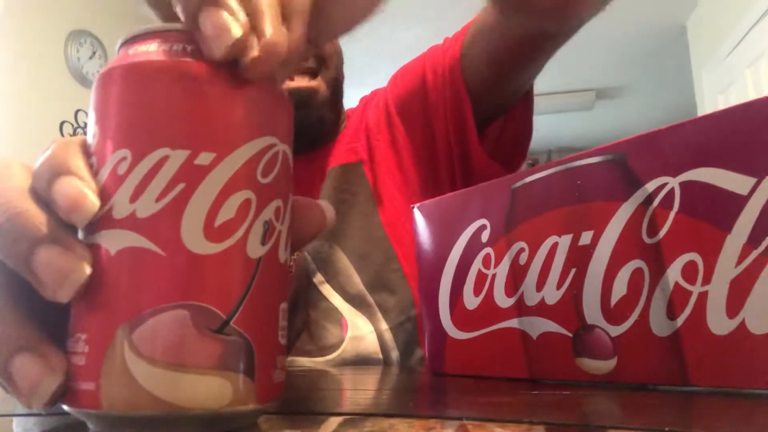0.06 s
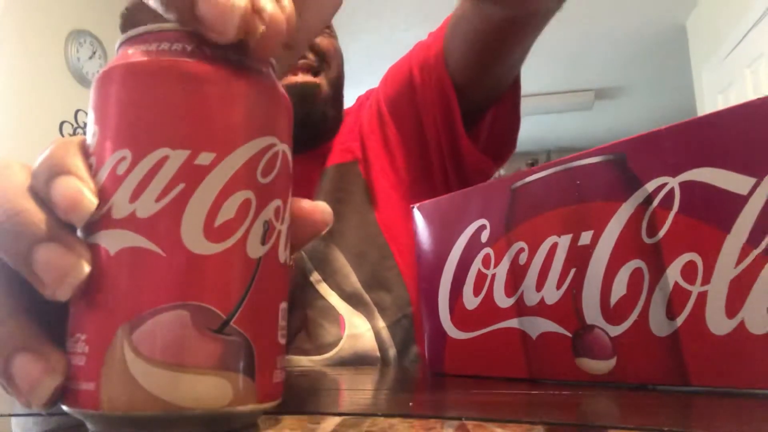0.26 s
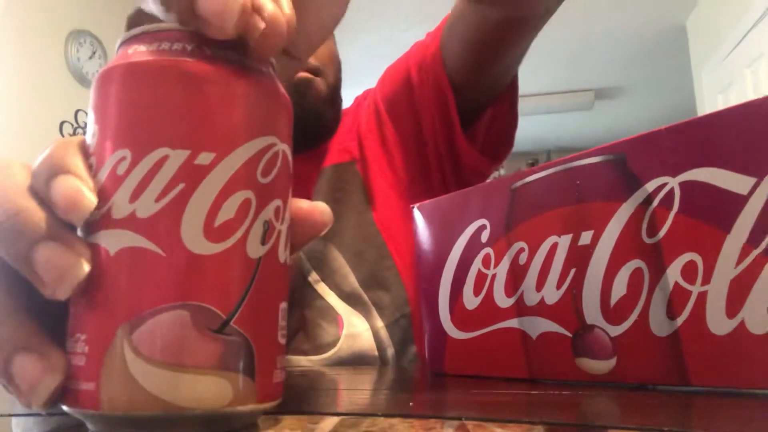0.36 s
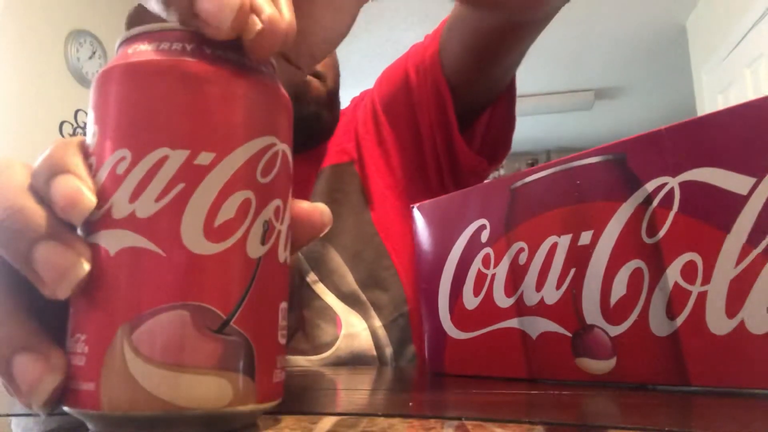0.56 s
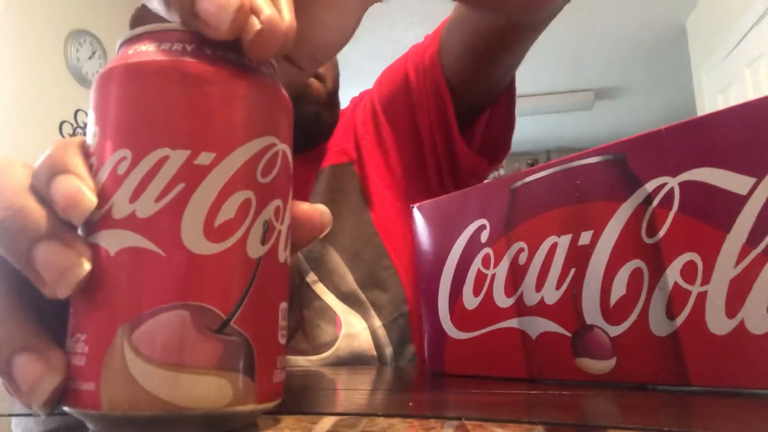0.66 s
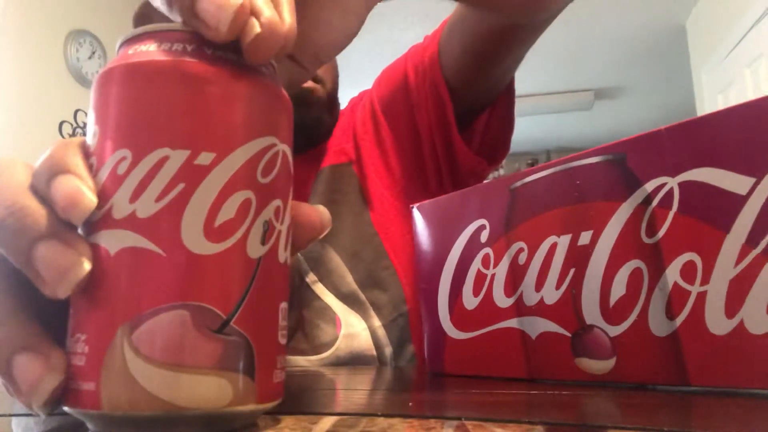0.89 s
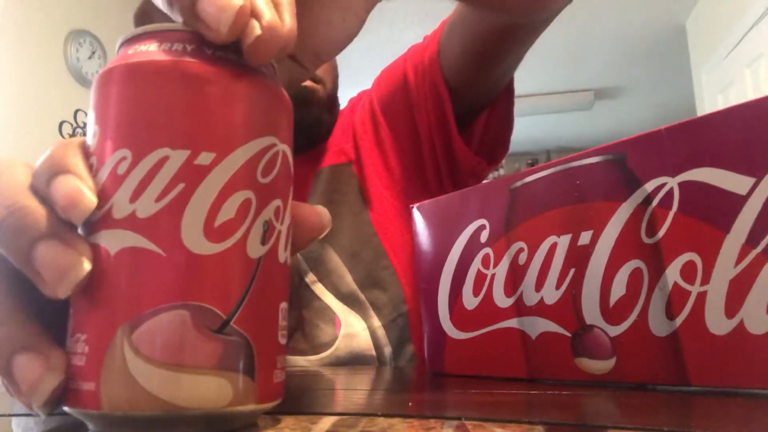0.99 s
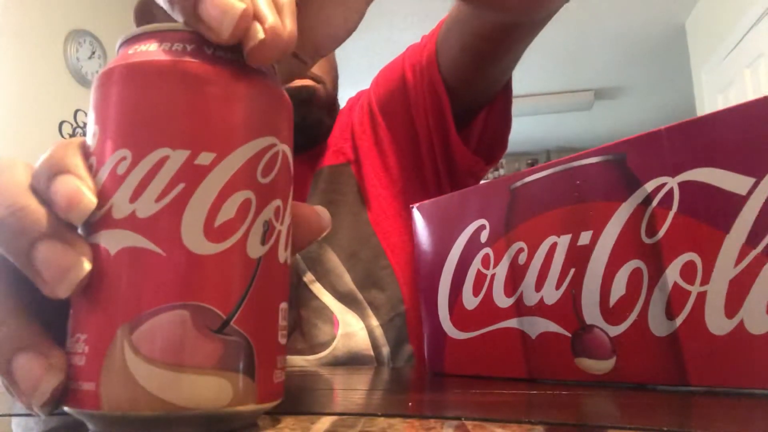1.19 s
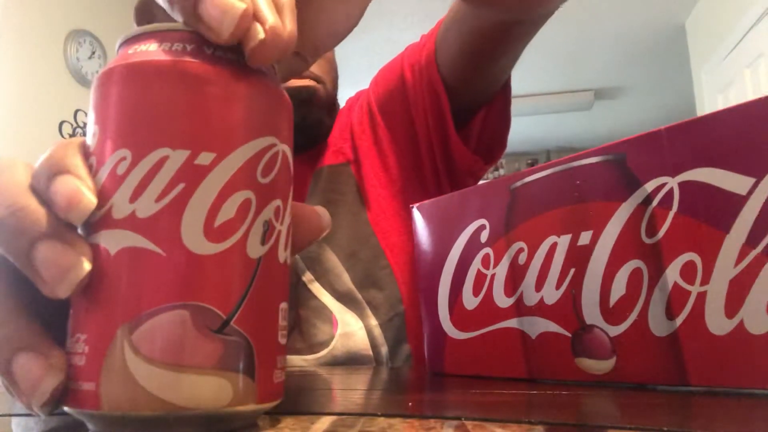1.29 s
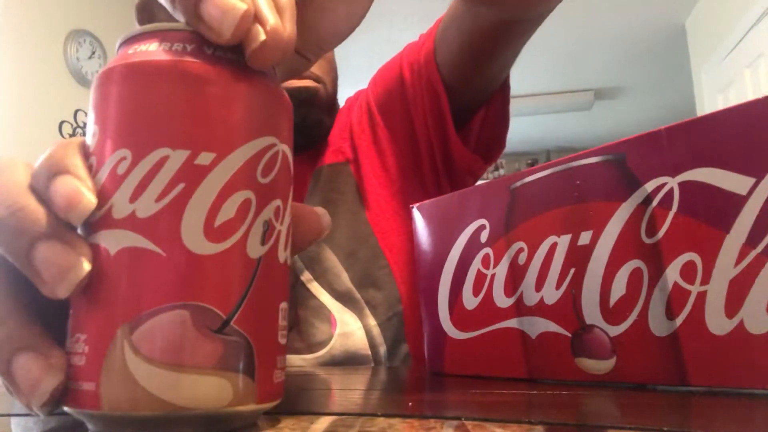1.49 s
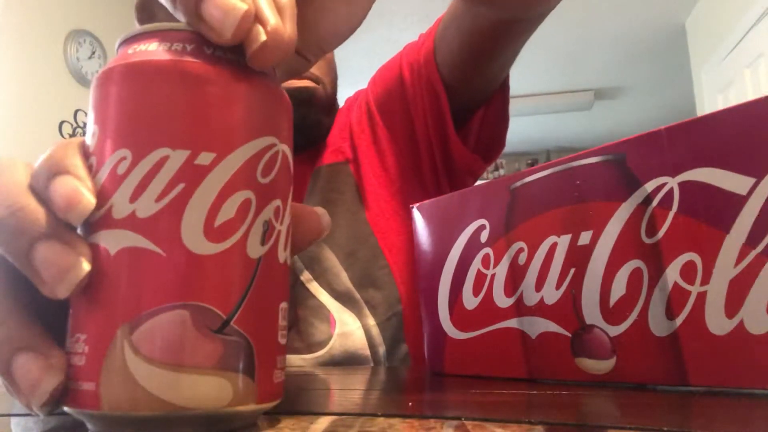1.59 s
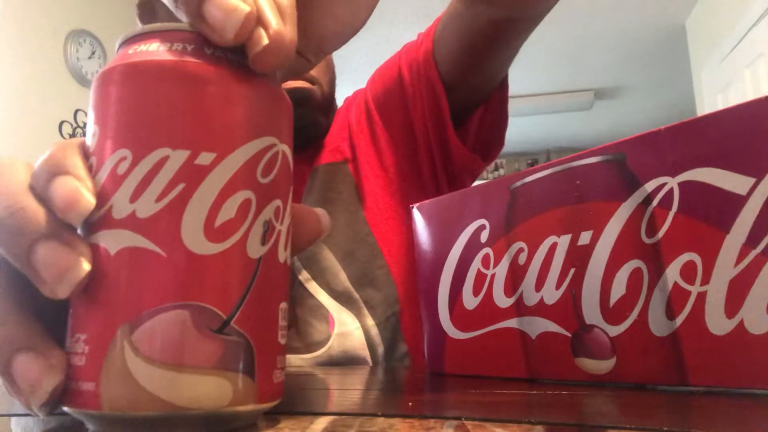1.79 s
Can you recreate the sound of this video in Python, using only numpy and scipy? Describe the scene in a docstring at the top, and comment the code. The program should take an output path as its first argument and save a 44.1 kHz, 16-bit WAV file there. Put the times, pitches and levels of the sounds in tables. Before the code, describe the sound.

A fingernail picks at a drink can's pull tab, close by. After faint ticks, the tab snaps sharply twice at about 0.2 seconds, again at 0.5 and more softly at 1.0, each with a slight low ring. Soft finger knocks come near 0.8 and 1.4 seconds. Light ticks and faint rubbing continue, with two clearer ticks at 1.8. An appliance hums quietly in the small room throughout.

```python
"""Four sharp metallic snaps sound close by, among small ticks, soft knocks and faint rubbing.
A fingernail picks at the pull tab of an aluminium drink can on a table. The tab slips and snaps back,
exciting the damped modes of the lid; the nail ticks on tab and rim, and a finger pad knocks and rubs.
The table top and a small room reflect the clicks, over the quiet hum of an appliance and dull room noise."""
import sys
import numpy as np
from scipy import signal
from scipy.fft import rfft, irfft
from scipy.io import wavfile
from scipy.ndimage import uniform_filter1d

SR = 44100
rng = np.random.default_rng(int(sys.argv[2]) if len(sys.argv) > 2 else 0)


def store_pcm(level_fs):
    """Save levels as 16-bit WAV."""
    pcm = np.round(np.clip(level_fs, -1, 1) * 32767).astype(np.int16)
    wavfile.write(sys.argv[1], SR, np.atleast_2d(pcm).T)


N = 81585

# snaps of the tab against the lid: t/s, then level/dB in each band
SNAPS = [(0.2212, -34.5, -28, -19, -28, -22, -31.5, -38, -54.5),
         (0.2481, -28.5, -28, -18, -26.5, -20, -24, -27.5, -45),
         (0.5275, -37, -38.5, -32, -37, -27.5, -22, -32.5, -25),
         (0.9954, -51, -47, -42, -44, -37.5, -34, -35, -35.5)]
# edges of the snap bands: f/Hz
SNAP_EDGES = [300, 650, 1050, 1800, 3000, 4700, 7000, 10000, 16000]
# ticks of the nail on tab and rim: t/s, then level/dB in each band
TICKS = [(0.0167, -79, -59.5, -65.5, -81, -88.5), (0.0218, -88, -64.5, -64.5, -67.5, -74.5),
         (0.117, -87.5, -77, -71.5, -65.5, -66), (0.164, -72, -62, -62, -72, -95),
         (0.233, -69, -62, -55, -57, -55.5), (0.3531, -58.5, -55, -58, -58, -72),
         (0.4354, -62.5, -60.5, -60.5, -62.5, -74.5), (0.5008, -60.5, -68, -66.5, -64.5, -75),
         (0.508, -54.5, -56, -54, -63, -69), (0.513, -56, -50, -44.5, -49, -69),
         (0.6159, -88, -63, -55.5, -56.5, -67.5), (1.0123, -59, -55, -50.5, -55, -72.5),
         (1.1433, -54, -69.5, -50.5, -48.5, -70.5), (1.1473, -62, -54, -49, -54.5, -77),
         (1.1821, -57.5, -61, -52.5, -54, -72.5), (1.507, -56.5, -66, -67, -62, -71.5),
         (1.5604, -64.5, -86, -63, -59.5, -68), (1.6876, -60.5, -59.5, -64, -56.5, -68),
         (1.7264, -82, -66.5, -67, -69, -76), (1.7438, -66, -77.5, -63, -57.5, -63.5),
         (1.8284, -50.5, -50.5, -48.5, -45.5, -51), (1.841, -53.5, -50.5, -51, -47.5, -59)]
# edges of the tick bands: f/Hz
TICK_EDGES = [400, 1050, 1800, 4600, 9000, 16000]
# modes of the lid and tab: f/Hz, relative level/dB, T60/s
LID_MODES = [(478, -12, 0.014), (786, -5.5, 0.011), (1150, -4.5, 0.0059), (1487, 1.5, 0.0046),
             (2065, -3.5, 0.013), (2550, -9.5, 0.009), (3270, 3.5, 0.0088), (4073, 0.5, .01),
             (4368, 2, .009), (5254, 2, 0.01), (6180, -2.5, 0.0072), (7120, -4.5, .01), (7993, -0.5, 0.01),
             (8720, -4, .011), (10310, -4, .008), (12020, -1, 0.008), (14600, -9, .003)]
# bands that the lid radiates poorly: f/Hz, width/Hz
LID_NOTCHES = [(1890, 340), (2980, 650)]
# modes of the can rocking on the table: f/Hz, level/dB re the snap's lowest band, T60/s
ROCKING_MODES = [(100, -19.5, .12), (164, -15, 0.28), (261.8, -14, 0.41), (282.4, -13, 0.058)]
# knocks of a finger pad: t/s, gain/dB
KNOCKS = [(.762, -44), (1.3982, -52.5)]
# modes of the can under a finger pad: f/Hz, relative level/dB, T60/s
CAN_MODES = [(626, -0.5, 0.018), (803.5, -2, 0.016), (954, -3, 0.018), (2010, -21.5, 0.01123)]
# strokes of skin on the can: t/s, duration/s, level/dB, centre f/Hz
RUBS = [(0.12, .03, -69.5, 1500), (0.194, .025, -63, 1340), (0.422, 0.037, -63, 1400),
        (0.511, 0.027, -56.5, 4700), (0.832, .09, -68, 1250), (1.027, 0.81, -75, 813)]
# reverberant tail of the room: f/Hz, gain/dB, T60/s
ROOM_TAIL = [(153, -5.5, 0.34), (386, -7.5, 0.14), (750, -12.5, 0.16), (1300, -19, 0.29), (2200, -12, 0.29),
             (2760, -13, 0.34), (4498, -13.5, 0.34), (6060, -17.5, 0.24), (7200, -18.5, 0.15),
             (7840, -12, 0.14), (9530, -17, 0.12), (11700, -11.5, 0.16), (15000, -23.5, .26)]
# tones of the appliance: f/Hz, level/dB
HUM_TONES = [(118.1, -51.3), (236.9, -67), (301.5, -69.5)]
# spectrum of the room noise: f/Hz, relative spectral level/dB
AIR_SPECTRUM = [(20, -30.5), (45, -6), (110, 7.5), (170, 1), (290, -3), (420, -7.5), (750, -12.5),
                (1100, -18), (1800, -24), (4000, -26.5), (8000, -31), (15500, -38.5)]


def lid_impact(crack_db, crack_s=.00099, rise_s=.00088, echo_s=.0008, echo_gain=.26):
    """Impulse response: a slipping nail cracks, the lid's modes ring and the table top reflects both."""
    ring = damped_modes(LID_MODES)
    t = np.arange(len(ring)) / SR
    ring += amp(crack_db) * rng.standard_normal(len(t)) * np.exp(-t / crack_s)
    ring *= 1 - np.exp(-t / rise_s)
    ring = low_cut(ring, hz=500)
    for hz, width in LID_NOTCHES:
        ring = signal.lfilter(*signal.iirnotch(hz, hz / width, SR), ring)
    add(ring, echo_s, echo_gain * ring)
    return ring


def click(band_db, edges, crack_db):
    """Direct and diffuse fields: the room receives the lid's sound from all sides, more evenly coloured."""
    direct = match_bands(lid_impact(crack_db), band_db, edges)
    pulse = low_cut(signal.unit_impulse(len(direct)), hz=510)
    all_round = match_bands(pulse, band_db, edges)
    sound = reverberation(all_round) + amp(-2) * reverberation(direct)
    add(sound, 0, direct)
    return sound


def thump(db, size=8192, rise_s=.004):
    """Free vibration: after a snap the whole can rocks on the table, a low ring with a soft onset."""
    onset = 1 - np.exp(-np.arange(size) / SR / rise_s)
    return amp(db) * damped_modes(ROCKING_MODES, size) * onset


def knock(db):
    """Soft impact: a finger pad excites a few short-lived modes of the can."""
    return amp(db) * damped_modes(CAN_MODES)


def rub(duration_s, db, centre_hz, grains_per_s=830, width_oct=.48, skirt_db=-13.5):
    """Stick-slip friction: skin on metal sends a swell of tiny pulses through one broad resonance."""
    n = round(duration_s * SR)
    slips = rng.random(N)[:n] < grains_per_s / SR
    strength = rng.standard_normal(N)[:n]
    spread_db = -2 * np.minimum(rng.exponential(1, N)[:n], 3)
    grains = slips * strength * amp(spread_db)
    octaves = np.log2((np.fft.rfftfreq(n, 1 / SR) + 1) / centre_hz)
    resonance = np.exp(-.5 * (octaves / width_oct) ** 2) + amp(skirt_db) / (1 + octaves ** 2)
    swell = np.hanning(n) ** .5
    return amp(db) * unit_rms(irfft(rfft(grains) * resonance, n) * swell)


def reverberation(x, size=256, delay_s=.0019):
    """Diffuse decay: the room's response is noise that dies exponentially, each band at its own rate."""
    hz, t, spectra = signal.stft(rng.standard_normal(SR // 2), SR, nperseg=size)
    decay_rate = np.log(1000) / curve_at(ROOM_TAIL, hz, column=2)[:, None]
    gain = amp(curve_at(ROOM_TAIL, hz))[:, None]
    spectra *= gain * np.sqrt(2 * decay_rate / SR) * np.exp(-decay_rate * t)
    response = np.zeros(SR // 2)
    add(response, delay_s, signal.istft(spectra, SR, nperseg=size)[1])
    return signal.fftconvolve(x, response)


def hum(waver_depth=.19, waver_hz=1.7):
    """Amplitude and phase modulation: the low tones of an appliance waver slowly at random."""
    t, hz = np.arange(N) / SR, np.fft.rfftfreq(N, 1 / SR)
    slow = np.exp(-(hz / waver_hz) ** 2)
    tones = np.zeros(N)
    for tone_hz, db in HUM_TONES:
        swell, phase = (waver_depth * unit_rms(irfft(rfft(noise) * slow, N))
                        for noise in rng.standard_normal((2, N)))
        tones += amp(db) * np.sqrt(2) * (1 + swell) * np.sin(2 * np.pi * tone_hz * t + phase)
    return tones


def air(db=-59.5, patch_db=.5, size=1024):
    """Ambient noise: a dull continuous spectrum, faintly patchy in frequency and time."""
    hz, _, spectra = signal.stft(rng.standard_normal(N), SR, nperseg=size)
    patches = uniform_filter1d(rng.standard_normal(spectra.shape), size=6, axis=0)
    patches = unit_rms(uniform_filter1d(patches, size=8, axis=1))
    spectra *= amp(curve_at(AIR_SPECTRUM, hz)[:, None] - patch_db * patches)
    return amp(db) * unit_rms(signal.istft(spectra, SR, nperseg=size)[1][:N])


def damped_modes(modes, size=4096, scatter_db=1.5, detune=.008):
    """Modal superposition: decaying sinusoids, scattered a little in level and pitch at each blow."""
    t = np.arange(size) / SR
    ring = np.zeros(size)
    for hz, db, t60 in modes:
        louder, sharper = rng.standard_normal(2)
        envelope = amp(db + scatter_db * louder) * np.exp(-np.log(1000) * t / t60)
        ring += envelope * np.sin(2 * np.pi * hz * (1 + detune * sharper) * t)
    return ring


def match_bands(blow, band_db, edges, span_s=.008):
    """Equalisation: three passes bring each band's energy near that of its level held for span_s."""
    hz = np.fft.rfftfreq(len(blow), 1 / SR)
    centres = np.sqrt(np.multiply(edges[1:], edges[:-1]))
    for _ in range(3):
        power = 2 * abs(rfft(blow)) ** 2 / len(blow) / (span_s * SR)
        band_power = [power[(hz >= lo) & (hz < hi)].sum() for lo, hi in zip(edges, edges[1:])]
        gain_db = np.array(band_db) - 10 * np.log10(band_power)
        blow = colour(blow, curve_at(np.column_stack([centres, gain_db]), hz))
    return blow


def colour(x, db):
    """Minimum-phase filtering: the Hilbert transform gives the phase from each bin's log gain."""
    log_gain = np.log(amp(np.concatenate([db, db[-2:0:-1]])))
    response = np.exp(np.conj(signal.hilbert(log_gain)))[:len(db)]
    return irfft(rfft(x) * response)


def low_cut(x, hz):
    """Second-order high-pass filtering."""
    return signal.sosfilt(signal.butter(2, hz, "high", fs=SR, output="sos"), x)


def curve_at(points, hz, column=1):
    """Interpolation of a table column over log frequency."""
    table = np.transpose(points)
    return np.interp(np.log(hz + 1), np.log(table[0] + 1), table[column])


def amp(db):
    """Amplitude ratio of a level in decibels."""
    return 10 ** (np.asarray(db) / 20)


def unit_rms(x):
    """Normalisation to rms 1."""
    return x / np.sqrt(np.mean(x ** 2) + 1e-20)


def add(mix, start_s, sound):
    """Superposition of a delayed sound on the mix, in place."""
    part = mix[max(round(start_s * SR), 0):][:len(sound)]
    part += sound[:len(part)]


def scene():
    """Linear superposition: snaps, ticks, knocks, rubs, reverberation, hum and air in one channel."""
    nail, skin = np.zeros((2, N))
    for start_s, *band_db in SNAPS:
        add(nail, start_s, click(band_db, SNAP_EDGES, crack_db=9))
        add(nail, start_s, thump(band_db[0]))
    for start_s, *band_db in TICKS:
        add(nail, start_s, click(band_db, TICK_EDGES, crack_db=3))
    for start_s, db in KNOCKS:
        add(skin, start_s, knock(db))
    for start_s, *stroke in RUBS:
        add(skin, start_s, rub(*stroke))
    return (nail + skin + reverberation(skin)[:N] + hum() + air())[None]


def record(dry, cutoff_hz=16000):
    """Band limiting: a linear-phase low-pass removes the highest treble."""
    low_pass = signal.firwin(255, cutoff_hz, window=("kaiser", 9), fs=SR)
    return signal.oaconvolve(dry, low_pass[None], "same")


dry = scene()
out = record(dry)
store_pcm(out)
```